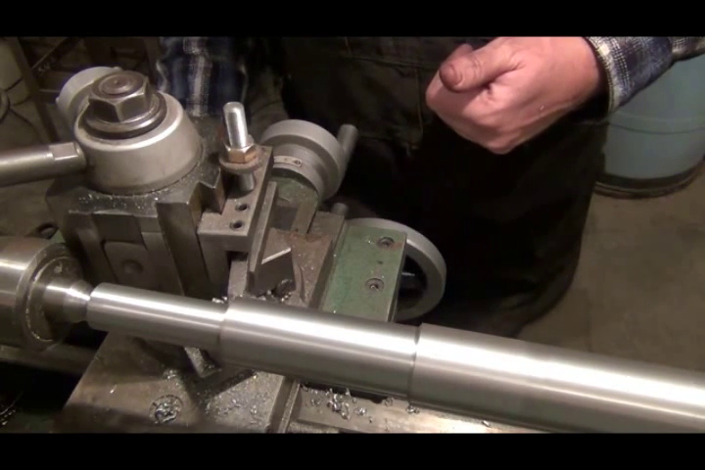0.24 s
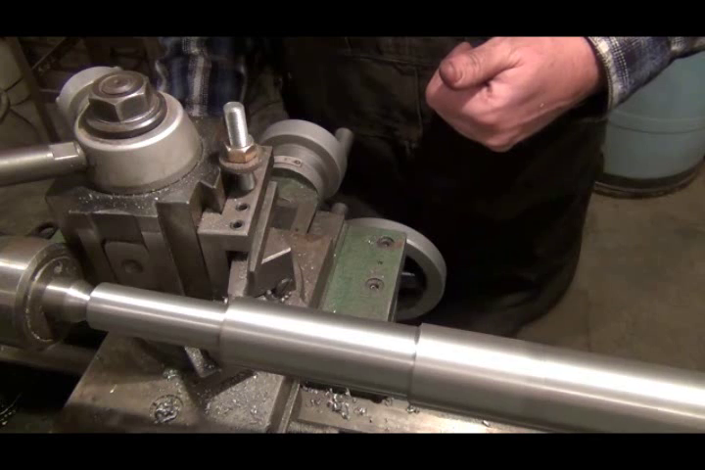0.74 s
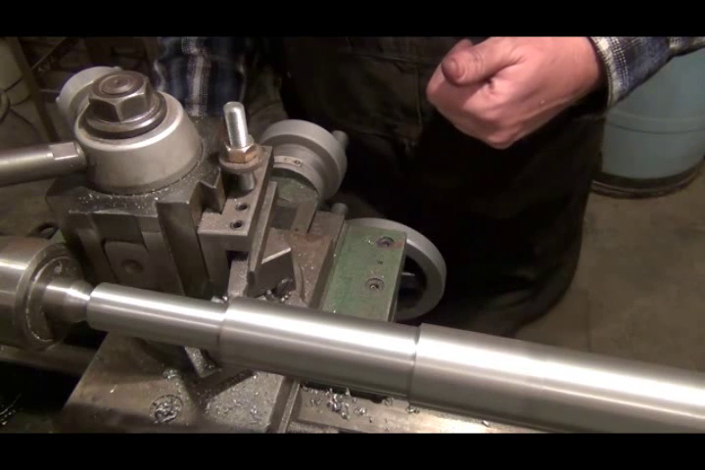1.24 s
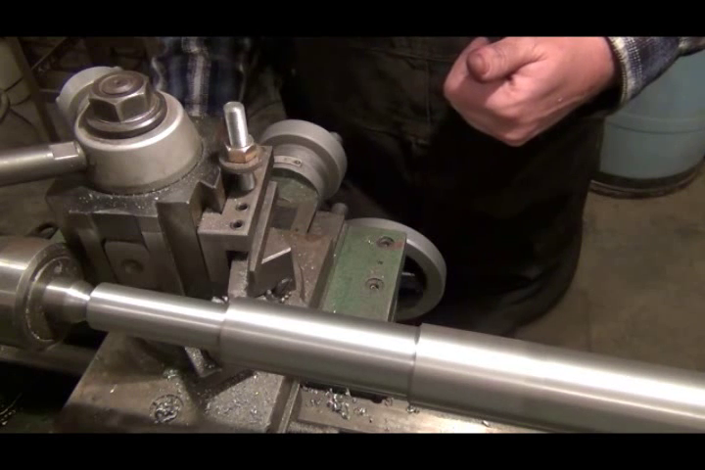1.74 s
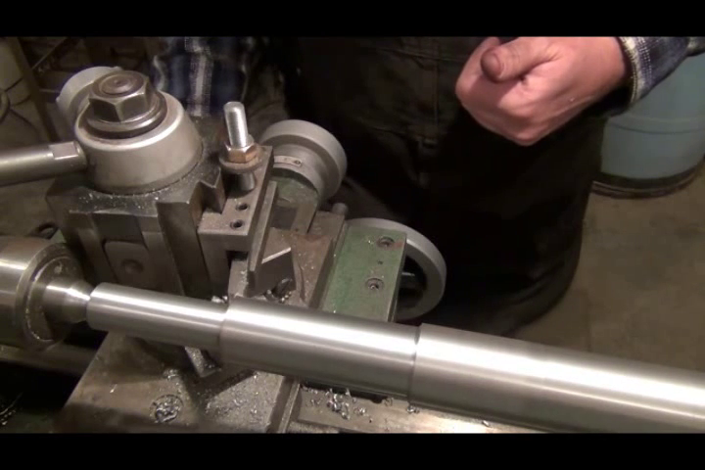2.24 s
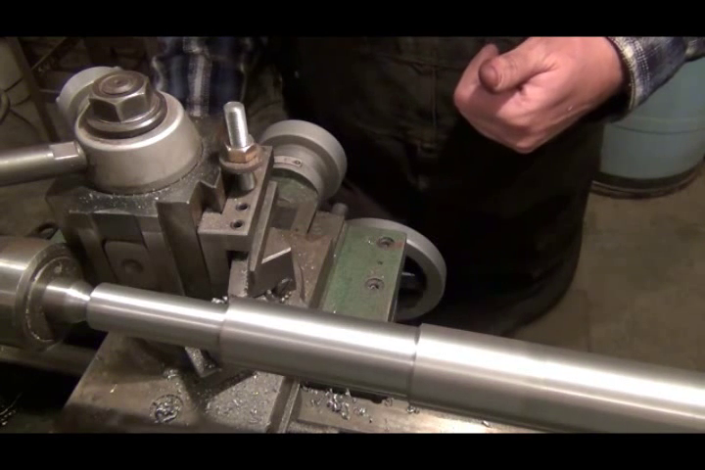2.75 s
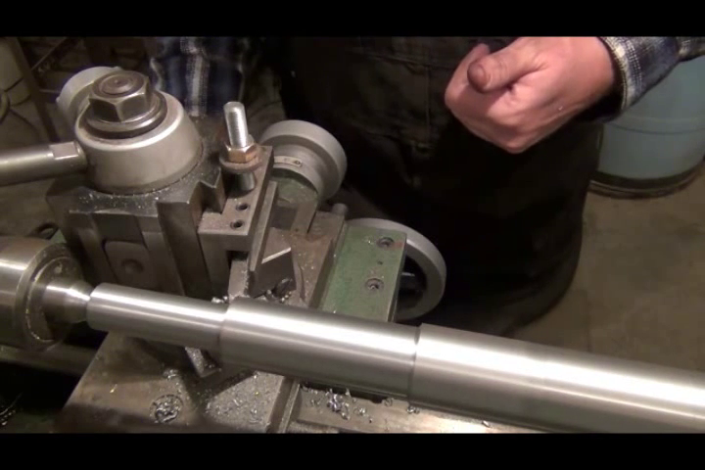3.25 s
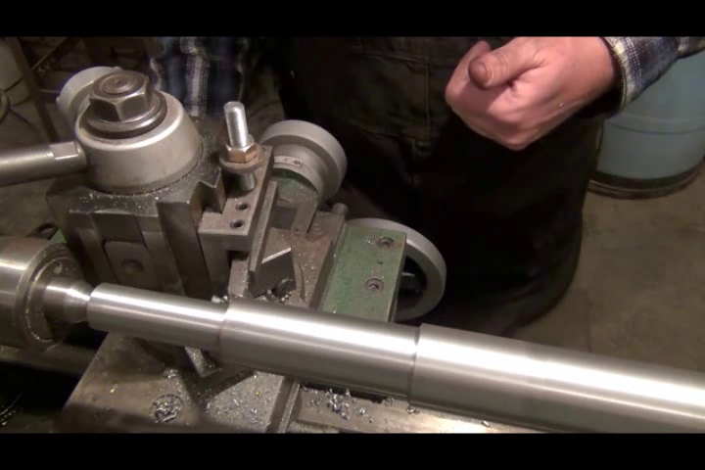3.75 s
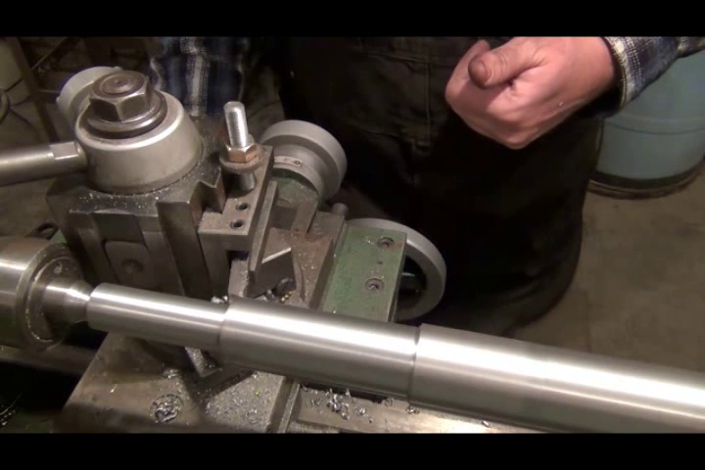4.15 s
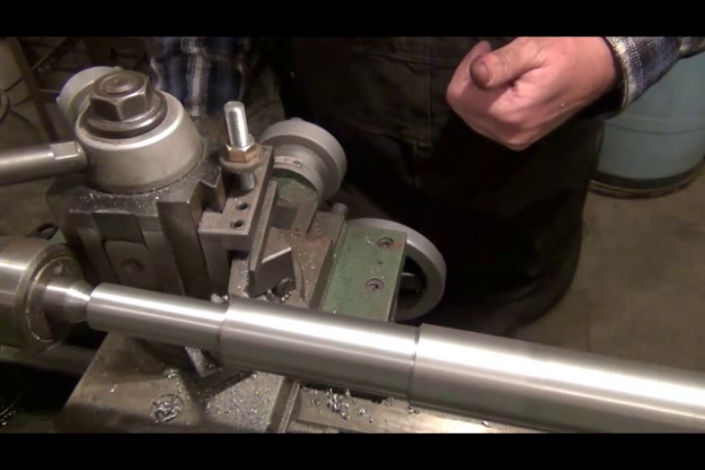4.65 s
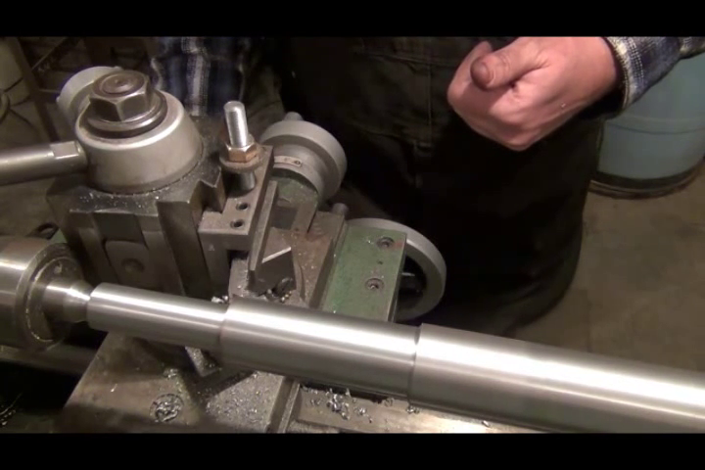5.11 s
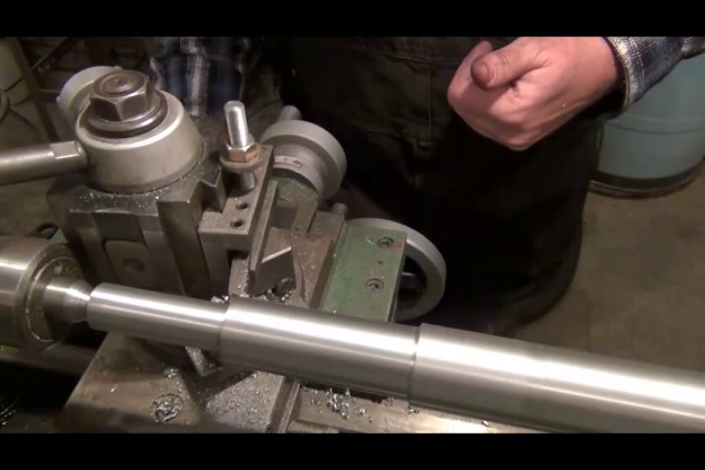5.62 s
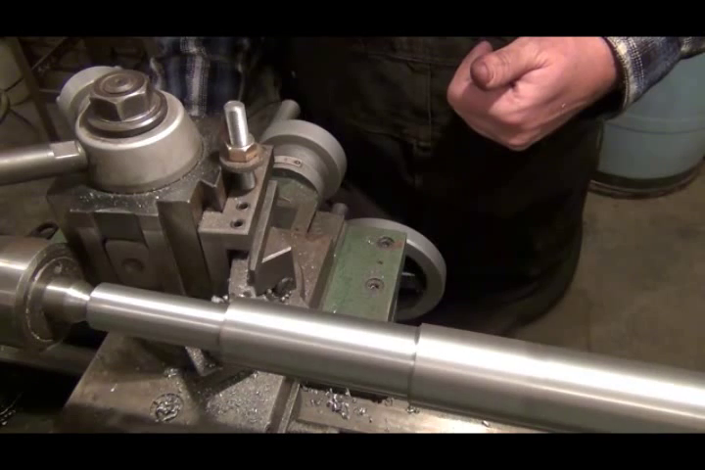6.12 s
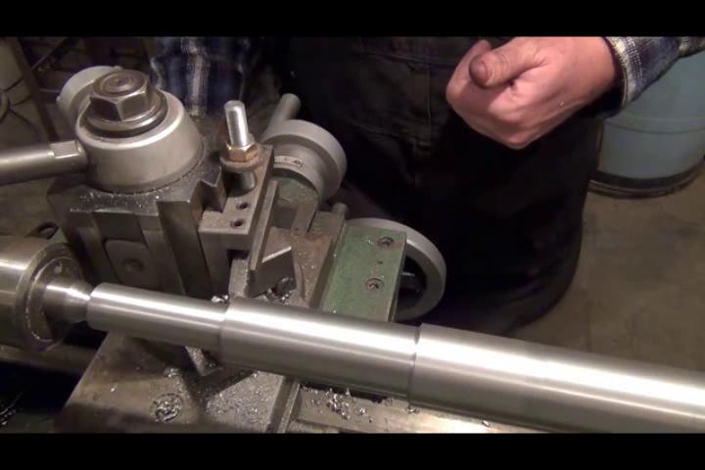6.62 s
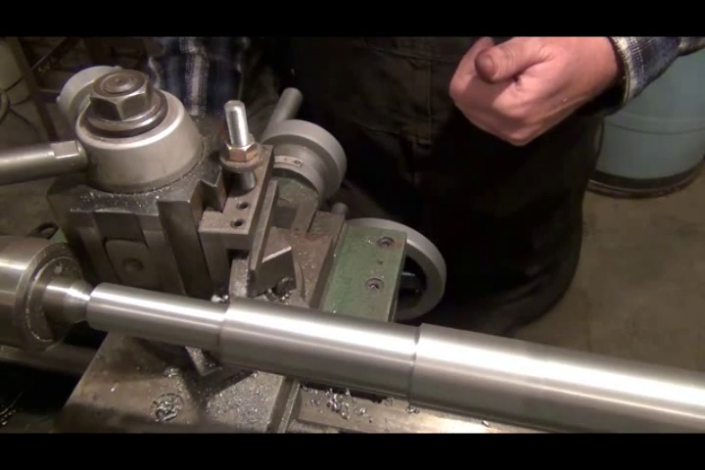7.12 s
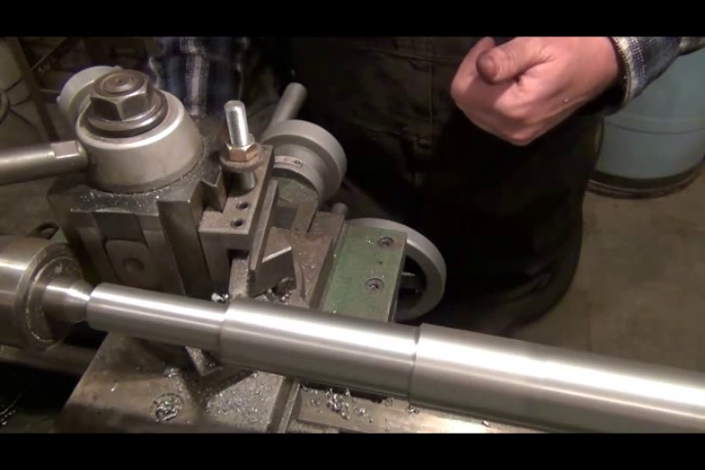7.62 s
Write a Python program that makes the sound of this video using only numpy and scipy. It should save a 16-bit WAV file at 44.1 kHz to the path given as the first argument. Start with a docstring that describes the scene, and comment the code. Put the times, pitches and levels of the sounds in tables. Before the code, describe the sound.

Close in a workshop, a running lathe cuts a steel bar. A shrill, nearly steady whine dominates, rough with fast beating and small stalls on every turn. Past the middle it breaks into brief chirps and sinks into a ringing hiss. Beneath, gears hum and grind and the drive clacks about six times a second, both swelling as the whine fades.

```python
"""Metal lathe cutting a steel bar

A lathe turns a steel bar about six times a second, heard from close by in a workshop. The tool chatters: a
high, bent sine and a steadier one beat together and stutter with every turn. Then this whine sinks into the
ringing hiss of the cut, which is noise through a resonance. Below it gears hum and rattle (sines and resonant
noise) and the drive clacks once a turn (noise bursts). The background din grows louder as the whine fades; a
fine hiss of chips lies on top."""
import sys
import numpy as np
from scipy import signal
from scipy.fft import rfft, irfft, next_fast_len
from scipy.io import wavfile
from scipy.ndimage import map_coordinates

SR = 44100
rng = np.random.default_rng(int(sys.argv[2]) if len(sys.argv) > 2 else 0)


def generate_wav(signal):
    """Clip the signal to [-1, 1] and save it as 16-bit WAV at the path in sys.argv[1]."""
    frames = np.transpose(np.atleast_2d(signal))
    scaled = np.clip(frames, -1, 1) * 32767
    pcm = np.round(scaled).astype(np.int16)
    wavfile.write(sys.argv[1], SR, pcm)


N = 347067
TIME = np.arange(N) / SR  # seconds
FIRST_CLACK_S, TURNS_PER_S = .1495, 5.9995


def amp(db):
    """Turn decibels into a gain."""
    return 10 ** (np.asarray(db) / 20)


def unit(x):
    """Scale x to an rms of 1."""
    return x / np.sqrt(np.mean(np.abs(x) ** 2) + 1e-20)


def along(points, hz):
    """Read (Hz, value) points at any frequency, on a log axis."""
    f, v = np.transpose(points)
    return np.interp(np.log(hz + 1), np.log(f + 1), v)


def curves(rows, at=TIME, period=None):
    """Join the rows by straight lines: one curve for each column after the first."""
    position, *columns = np.transpose(rows)
    return [np.interp(at, position, column, period=period) for column in columns]


def bumps(rows):
    """Smooth bumps from rows of (time in s, width at half height in s, height)."""
    out = np.zeros(N)
    for s, width, height in rows:
        near = slice(*np.searchsorted(TIME, [s - 2 * width, s + 2 * width]))
        half_widths = np.abs(2 * (TIME[near] - s) / width)
        out[near] += height * .5 ** (half_widths ** 3)
    return out


def wobble(rate):
    """A smooth random curve with `rate` random knots a second."""
    coarse = TIME[::16]
    knots = rng.standard_normal(int(N * rate / SR) + 4)
    return np.interp(TIME, coarse, map_coordinates(knots, [coarse * rate]))


def filtered(x, response):
    """Shape x by a response, given as a function of frequency in Hz."""
    m = next_fast_len(N + SR // 4)
    return irfft(rfft(x, m) * response(np.fft.rfftfreq(m, 1 / SR)), m)[..., :N]


def colour(points):
    """The response that follows (Hz, dB) points."""
    return lambda hz: amp(along(points, hz))


def body(modes):
    """The response of resonances (Hz, width in Hz, dB), added with alternating sign."""
    def response(f):
        total = 0
        for k, (centre, width, db) in enumerate(modes):
            peak = 1j * f * width / (centre * centre - f * f + 1j * f * width)
            total = total + (-1) ** k * amp(db) * peak
        return total
    return response


# How alike left and right sound. Each row: frequency in Hz, likeness from 0 to 1.
LIKENESS = [(30, 0.96), (100, 1), (300, 0.82), (700, 0.92), (1200, 0.68), (1900, 0.99), (2500, 0.84),
            (3000, 0.73), (3900, 0.73), (4400, 1), (7000, 1)]


def rush(response, force=1):
    """Random force through a response, rms 1; the workshop walls make the two sides partly unlike."""
    def spread(hz):
        angle = np.arccos(np.clip(along(LIKENESS, hz), -1, 1)) / 2
        return response(hz) * np.array([np.cos(angle), np.sin(angle)])
    mid, side = filtered(force * rng.standard_normal((2, N)), spread)
    return unit(np.array([mid + side, mid - side]))


def spindle():
    """Count the turns made since the first clack."""
    return (TIME - FIRST_CLACK_S) * TURNS_PER_S


def passes(share):
    """The times in seconds at which one place on the bar comes round to the tool."""
    return FIRST_CLACK_S + (np.arange(-1, N / SR * TURNS_PER_S) + share) / TURNS_PER_S


# from turn to turn a spot shifts a little and changes in length and strength
SPOT_JITTER_S, SPOT_LENGTH_SCATTER_DB, SPOT_SCATTER_DB = 0.0037, 1.5, 1.5


def each_turn(spots):
    """Rows of (time, length, height): on each pass a spot acts or not by its odds, varying at random."""
    rows = []
    for share, length, height, odds in spots:
        s = passes(share)
        late, longer, stronger = rng.standard_normal((len(s), 3)).T
        acts = rng.random(len(s)) < odds
        starts = s + SPOT_JITTER_S * late
        lengths = length * amp(SPOT_LENGTH_SCATTER_DB * longer)
        heights = acts * height * amp(SPOT_SCATTER_DB * stronger)
        rows += list(zip(starts, lengths, heights))
    return rows


# Rise in level of the background din, also used by the thuds and chips below. Each row: time in seconds, level
# in dB before each layer's own level.
DIN_SWELL = [(0.0, -29.5), (4.1, -24), (6.38, -17), (7.87, -15)]
# Load on the gears around a turn. Each row: share of a turn from 0 to 1,
# change of the low din in dB, change of the high din in dB.
GEAR_LOAD = [(0, -1, 0.5), (.1, 0.5, 2), (.3, 2, 0.5), (.5, -0.4, -0.5), (.62, -0.5, 2), (.78, -0.5, -0.5),
             (.9, 1, 0.5)]
# Resonances of the headstock. Each row: frequency in Hz, width in Hz, relative level in dB.
HOUSING_MODES = [(204.6, 9.1, -7), (238, 22, -6), (287, 8.8, -0.5), (306, 13.4, -0.5), (371.6, 22.7, 3),
                 (418, 30, -1), (469, 34, 2.5), (502.4, 39, 2), (549.7, 18, 1.5), (598, 16, -1.5),
                 (650, 28, -3.5), (761.5, 29, -4)]
# Resonances of its covers. Each row: frequency in Hz, width in Hz, relative level in dB.
COVER_MODES = [(899, 20, -3), (990, 89, -5), (1050, 57, -2), (1125, 27, -1), (1196, 60, -2.5),
               (1351, 34, 0), (1418, 40, 1), (1538, 42, 1), (1681, 25, 1), (1760, 56, 1), (1890, 71, 0),
               (2060, 91, -6.5), (2376, 165, -9.5), (2791, 30, -2.5), (3234, 35, -9), (3376, 25, -14),
               (3400, 13, -6.5), (3556, 14, -8.5), (3720, 15, -9), (3966, 27, -7), (4900, 110, -16)]
# Broad grinding noise. Each row: frequency in Hz, relative level in dB per Hz.
GRIND_COLOUR = [(100, -26), (250, -6), (450, -3), (850, -1), (1300, -1.5), (1850, -5.5), (2200, -10.5),
                (3000, -6.5), (4000, -11), (4500, -12), (7000, -16), (11000, -36)]
# Gear and motor tones. Each row: frequency in Hz, relative rms level in dB.
GEAR_TONES = [(54, -66), (120, -59), (310, -42), (378, -38.5), (480, -42), (761, -41), (1121.7, -35),
              (1256, -40), (1425, -42.5), (1663, -37), (1767, -36.5), (2782, -47.5)]
# Low rumble. Each row: frequency in Hz, relative level in dB per Hz.
RUMBLE_COLOUR = [(15, -50), (28, -30), (50, -5), (95, -8.5), (150, 3), (210, 1.5), (300, -3), (600, -43)]
MESH_HZ = 1016.2  # strongest tone of the meshing teeth
GEARS_DB, RUMBLE_DB = -5.5, -22.5  # against the din


def gears(turns):
    """Teeth rattle in the headstock, pulsing with motor torque and load, around steady mesh tones."""
    din_db, = curves(DIN_SWELL)
    low_db, high_db = curves(GEAR_LOAD, turns, period=1)
    torque = np.sin(2 * np.pi * 120 * TIME)
    housing = amp(-1.5 + low_db) * rush(body(HOUSING_MODES), amp(2.3 * torque + 1.43 * wobble(90)))
    covers = amp(1.0 + high_db) * rush(body(COVER_MODES), amp(2 * torque + 1.64 * wobble(200)))
    grind = amp(-2.0 + high_db) * rush(colour(GRIND_COLOUR), amp(0.88 * torque + 1.5 * wobble(250)))
    # each tone wavers a little; the higher ones reach the two sides more out of step
    tones = np.zeros((2, N))
    for hz, db in GEAR_TONES:
        phase = 2 * np.pi * hz * TIME + 0.73 * wobble(14)
        side_phase = min(hz / 1500, .3) * rng.standard_normal((2, 1))
        tones += np.sqrt(2) * amp(db + 2.05 * wobble(12)) * np.sin(phase + side_phase)
    mesh_phase = 2 * np.pi * MESH_HZ * TIME + 0.11 * wobble(11)
    mesh = np.sqrt(2) * amp(-29.0 + 0.83 * wobble(14)) * np.sin(mesh_phase)
    rattle = housing + covers + grind + amp(25.0) * (tones + mesh)
    rumble = rush(colour(RUMBLE_COLOUR))
    return amp(din_db + GEARS_DB) * rattle + amp(din_db + RUMBLE_DB) * rumble


def thuds(times):
    """Each clack also sets the headstock humming: single pulses ring three resonances."""
    blows = np.zeros(N)
    din_db, = curves(DIN_SWELL)
    for s, chance in zip(times, rng.standard_normal(len(times))):
        blows[round(s * SR)] = amp(2.8 * chance)
    hum = unit(filtered(blows, body([(381.4, 18, -6), (486.3, 10.6, 0), (513.4, 16, -6.0)])))
    return amp(-38.5 + 0.092 * (din_db - din_db.mean())) * hum


CLACK_SCATTER_DB, CLACK_JITTER_S = 0.8, .0006


def clack_times():
    """One clack per turn, a hair early or late."""
    s = passes(0)
    s = s + CLACK_JITTER_S * rng.standard_normal(len(s))
    return s[(s > 0) & (s < TIME[-1])]


# Strength of the clacks. Each row: time in seconds, strength in dB before the final mix.
CLACK_STRENGTH = [(0, -24.5), (.65, -23), (.81, -18), (2.6, -15), (5.4, -12.5), (7.87, -13.5)]
# Colour of a clack. Each row: frequency in Hz, relative level in dB per Hz.
CLACK_SPECTRUM = [(200, -36), (500, -20), (800, -14.5), (1400, 6), (1850, 3), (2150, -10.5), (2700, -1),
                  (3200, -9), (3900, -2), (4600, -22.5), (7000, -19.5), (11000, -43)]


def clacks(times):
    """Slack in the drive closes once a turn: a sharp blow, a rebound, a short rattle, later light ticks."""
    power = np.zeros(N + SR)
    t = np.arange(SR // 4) / SR

    def blow(delay, t60):
        # starts at `delay` and falls by 60 dB in t60, both in seconds
        return (t >= delay) * amp(-60 * np.abs(t - delay) / t60)

    strength_db = curves(CLACK_STRENGTH, times)[0]
    strength_db = strength_db + CLACK_SCATTER_DB * rng.standard_normal(len(times))
    for s, db, chance in zip(times, strength_db, rng.standard_normal((len(times), 5))):
        rebound_s = 0.0045 + 0.0016 * abs(chance[1])
        contacts = [
            amp(-1.0 + 1.3 * chance[4]) * blow(0, 0.032),  # sharp blow
            amp(-0.5) * blow(0, 0.12),  # short rattle
            amp(-7 + 2 * chance[0]) * blow(rebound_s, 0.022),
            amp(-11) * blow(0, 0.26),  # weak tail
            amp(-9.5 + 3.3 * chance[2]) * blow(0.08, 0.016),  # light ticks
            amp(-13 + 3.6 * chance[3]) * blow(0.09, 0.031)]
        power[round(s * SR):][:len(t)] += amp(db) ** 2 * np.sum(np.square(contacts), axis=0)
    return amp(-4) * np.sqrt(power[:N]) * rush(colour(CLACK_SPECTRUM))


# Colour of the chip hiss. Each row: frequency in Hz, relative level in dB per Hz.
CHIP_COLOUR = [(2500, -13), (5000, -20), (6400, -23), (7000, 12), (7500, -3.5), (8000, 8.5), (8400, -3),
               (9000, 9), (9600, 6), (10400, 3), (11500, 0.5), (12200, -9.5)]
HISS_DB, HISS_FOLLOWS = -39.5, 0.52  # mean level; share of the din's swell it follows


def chips():
    """The chip shears off the bar with a fine, grainy hiss: noise of quickly changing strength."""
    din_db, = curves(DIN_SWELL)
    level_db = HISS_DB + HISS_FOLLOWS * (din_db - din_db.mean())
    return amp(level_db) * rush(colour(CHIP_COLOUR), amp(1.1 * wobble(600)))


# Strength of the chatter before its limit. Each row: time in seconds, steady swing in dB,
# ring of the plain cut in dB.
CUT_STRENGTH = [(0, -6, -30), (1.1, -6, -26.5), (2, -8.5, -22.5), (4.4, -11, -25), (4.65, -24.5, -24.5),
                (6.2, -31.5, -24.5), (7.3, -26.5, -22.5), (7.87, -25, -23)]
# Hard and soft stretches around the bar. Each row: share of a turn after the clack from 0 to 1,
# change of swing in dB, pitch in Hz before the climb and wavering.
BAR_STRETCHES = [(.02, -3, 5490), (.08, -2, 5600), (.18, 0, 5630), (.3, 0, 5625), (.39, -3, 5580),
                 (.45, -1, 5605), (.52, -3, 5565), (.62, 1.5, 5608), (.77, 0, 5638), (.87, -2, 5578),
                 (.96, -3, 5508)]
# Places on the bar where the whine stalls. Each row: share of a turn from 0 to 1,
# typical length in seconds, typical depth from 0 to 1, odds per turn from 0 to 1.
STALLS = [(.24, 0.024, 0.52, 0.22), (.38, 0.016, 0.5, 0.4), (.53, 0.018, 0.56, .25), (.74, 0.015, .6, .12),
          (.99, .024, 0.65, 0.93)]
# The few times the whine sinks deeply. Each row: time in seconds, length in seconds, depth from 0 to 1.
DEEP_DIPS = [(.32, 0.051, 0.64), (.653, .03, 0.77), (4.053, 0.032, 1), (4.277, 0.038, 1)]
# Places where the dying whine flares up. Each row: share of a turn from 0 to 1,
# typical length in seconds, level in dB before fading, odds per turn from 0 to 1.
FLARES = [(.13, 0.017, -13, .75), (.25, .014, -14, .4), (.44, 0.012, -10, .65), (0.59, 0.017, -12.5, .9),
          (.78, .015, -13, .75), (0.928, 0.021, -13, .45)]
FLARES_FROM_S, FLARES_TO_S, FLARE_FADE_DB_PER_S = 4.5, 6.1, 4.5
# the mode climbs in pitch as the chatter dies
CLIMB_FROM_S, CLIMB_HZ_PER_S = 5.25, 42


def chatter(turns):
    """Tool and bar feed their own vibration; the tool sags and stalls, beating with the ringing bar."""
    swing_db, ring_db = curves(CUT_STRENGTH)
    climb_hz = CLIMB_HZ_PER_S * np.maximum(TIME - CLIMB_FROM_S, 0)
    around_db, pitch_hz = curves(BAR_STRETCHES, turns + .022 * wobble(14), period=1)
    grip = (1 - bumps(each_turn(STALLS))) * (1 - bumps(DEEP_DIPS))
    grip = np.clip(grip, .05, 1)
    catches = each_turn([(share, length, amp(db), odds) for share, length, db, odds in FLARES])
    flare_rows = []
    for s, length, height in catches:
        if FLARES_FROM_S < s < FLARES_TO_S:
            fade = amp(-FLARE_FADE_DB_PER_S * (s - FLARES_FROM_S))
            flare_rows.append((s, length, height * fade))
    swing = amp(swing_db) * grip + bumps(flare_rows)

    tool_hz = pitch_hz + climb_hz + 12 * wobble(30) + 8 * wobble(300)
    tool_level = swing * amp(around_db + 0.9 * wobble(70))
    tool = tool_level * np.exp(2j * np.pi * np.cumsum(tool_hz) / SR)
    # the bar nearly holds its own pitch, so every sag of the tool makes fast beats
    bar_hz = 5620 + climb_hz + 7 * wobble(25)
    bar = swing * amp(-4.0 + 1.9 * wobble(19)) * np.exp(2j * np.pi * np.cumsum(bar_hz) / SR)

    # the tearing chip keeps the same mode ringing, a little higher late in the cut
    skirt = colour([(3500, -32), (5000, -6), (5400, 2.5), (5770, 1), (5900, -1.0), (6300, -4),
                    (8000, -23)])
    early = rush(lambda hz: body([(5620, 130, 0)])(hz) * skirt(hz)).mean(axis=0)
    late = rush(lambda hz: body([(5655, 210, 0)])(hz) * skirt(hz)).mean(axis=0)
    late_share = np.clip(climb_hz / 50, 0, 1)
    ring = np.sqrt(1 - late_share) * early + np.sqrt(late_share) * late
    ring = amp(ring_db + 2.1 * wobble(50)) * ring
    motion = amp(1.0) * (tool + bar) + signal.hilbert(ring, next_fast_len(N))[:N]

    # the swing cannot grow past the point where the tool leaves the metal:
    # flat tops between narrow notches
    ceiling = amp(-7.5 + 0.56 * wobble(40))
    motion = motion / (1 + (np.abs(motion) / ceiling) ** 4) ** (1 / 4)
    # squaring doubles the pitch
    overtone = amp(-23.5) * motion ** 2 * np.exp(1j * wobble(220))
    # the steel radiates best near its mode, which rounds the notches
    radiation = colour([(4800, -7), (5300, -1.5), (5480, 0.5), (5750, -0.5), (5900, 0.0), (6400, -12)])
    return amp(0.51 * wobble(60)) * filtered(motion.real, radiation) + overtone.real


def scene():
    """Mix the machine, a little to the right, with the cut straight ahead."""
    turns, times = spindle(), clack_times()
    headstock = gears(turns) + thuds(times) + clacks(times)
    left_right = amp([[-.65], [.6]])
    return headstock * left_right + chips() + chatter(turns)


TOP_HZ = 11950


def record(dry):
    """Cut off the sound very steeply above the top frequency."""
    return filtered(dry, lambda hz: 1 / (1 + (hz / TOP_HZ) ** 160))


dry = scene()
out = record(dry)
generate_wav(out)
```